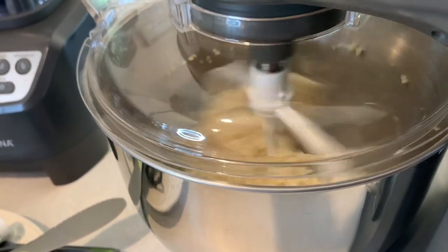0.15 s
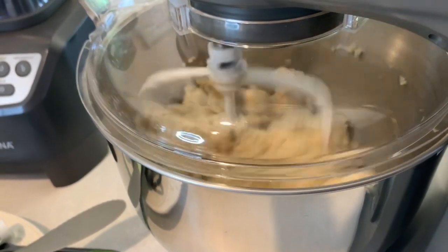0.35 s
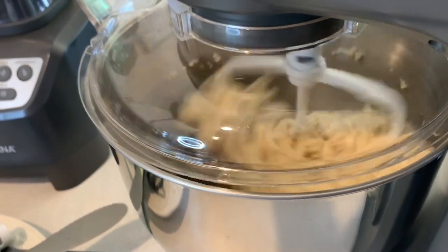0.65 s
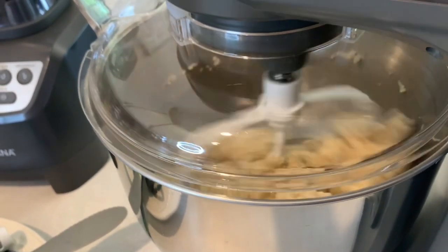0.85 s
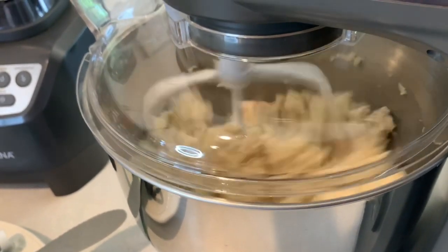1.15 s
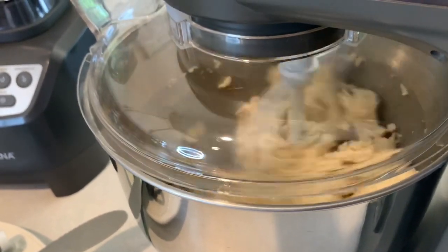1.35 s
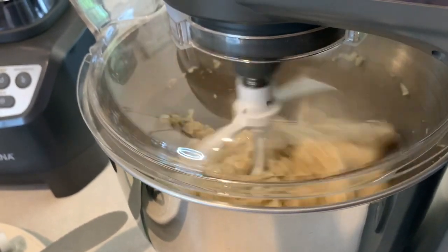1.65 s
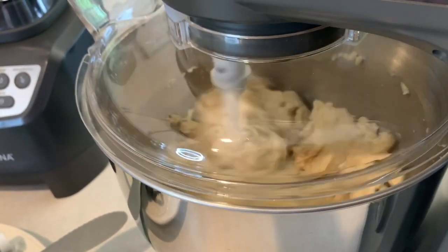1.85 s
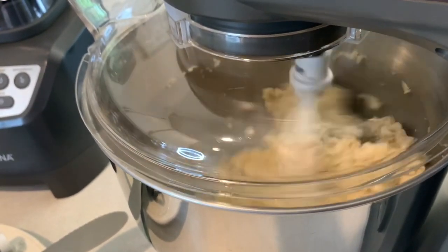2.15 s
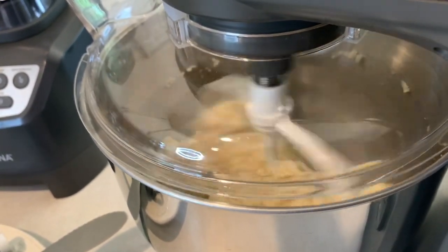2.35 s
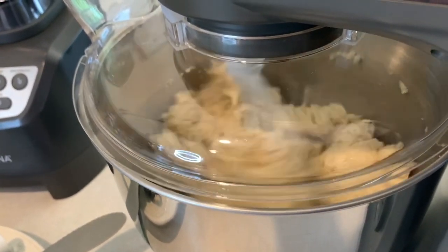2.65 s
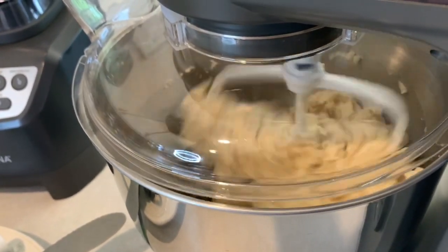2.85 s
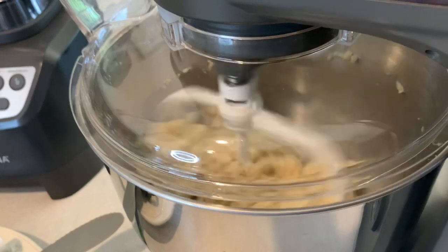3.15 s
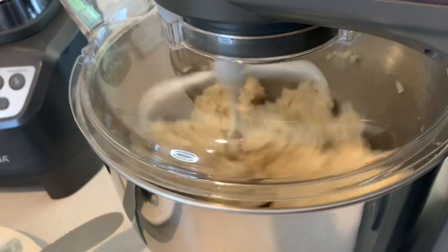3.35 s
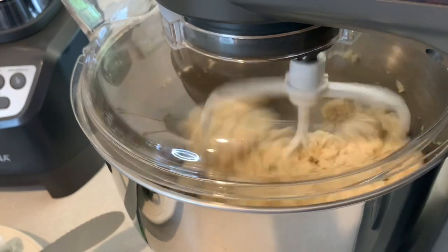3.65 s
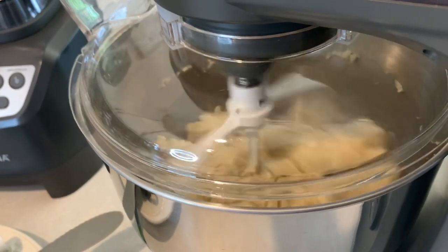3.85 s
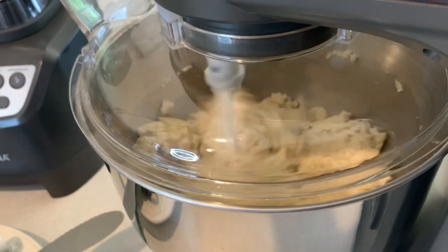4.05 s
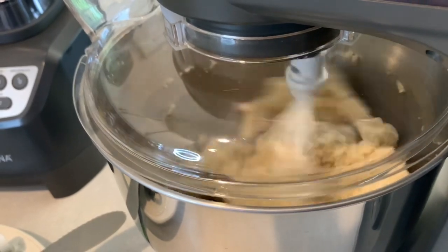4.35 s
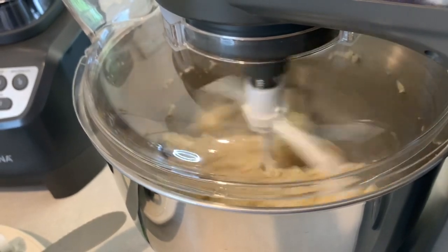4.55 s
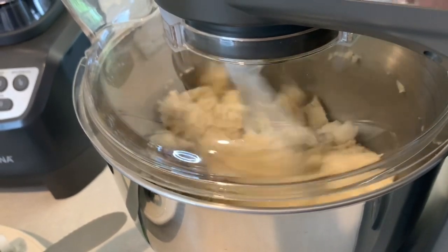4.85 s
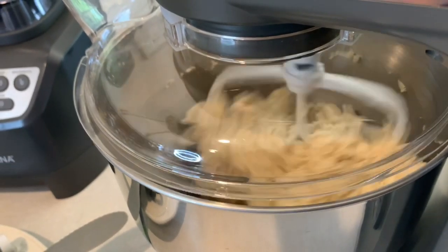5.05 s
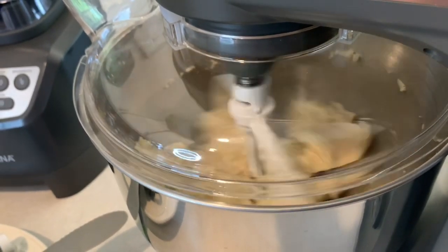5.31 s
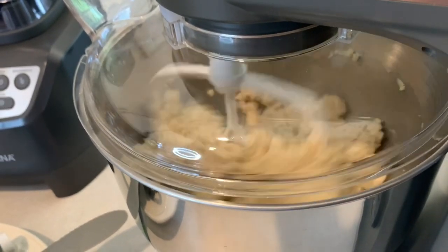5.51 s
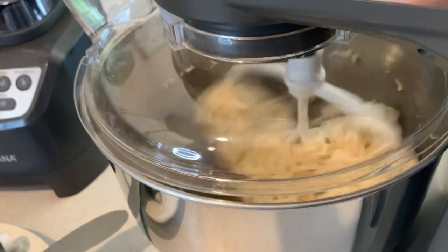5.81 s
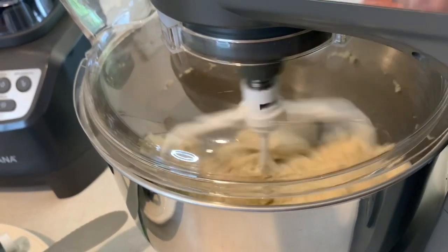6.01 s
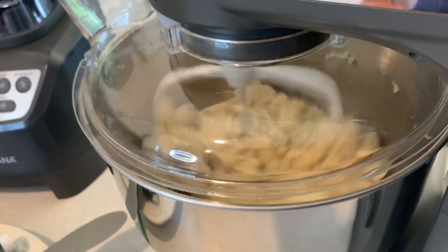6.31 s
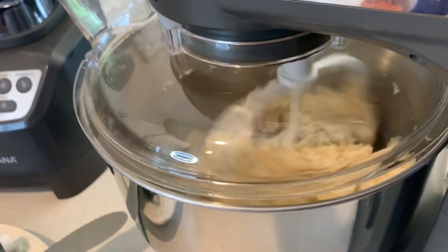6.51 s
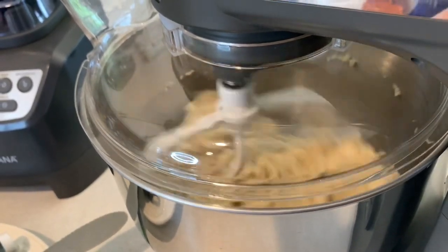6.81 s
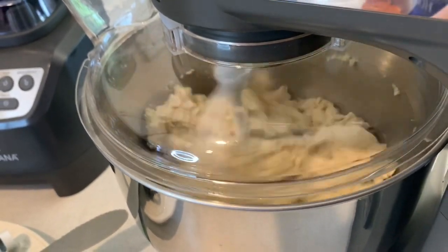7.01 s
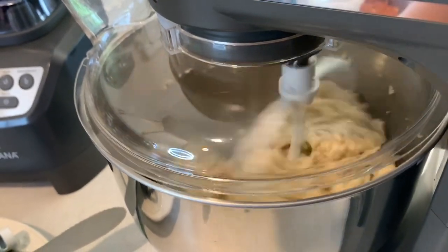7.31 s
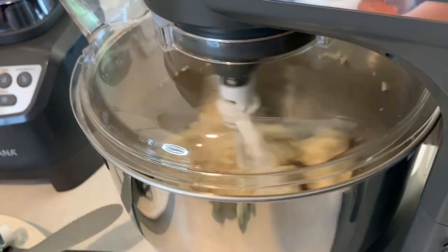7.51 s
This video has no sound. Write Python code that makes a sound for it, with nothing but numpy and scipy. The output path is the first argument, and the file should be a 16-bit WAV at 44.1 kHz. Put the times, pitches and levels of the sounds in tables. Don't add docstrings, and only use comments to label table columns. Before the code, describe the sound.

A stand mixer works stiff dough in a steel bowl, heard very close in a kitchen. A constant electric hum and gear whine sit under a harsh, bright metallic buzz with rapid ticking. The load wavers as the beater circles and digs in, with dull thumps of dough. The handheld microphone is overloaded and slightly distorted; the mixer never stops.

```python
import sys
import numpy as np
from scipy import signal
from scipy.fft import rfft, irfft, next_fast_len
from scipy.io import wavfile
from scipy.ndimage import uniform_filter1d

SR = 44100
rng = np.random.default_rng(int(sys.argv[2]) if len(sys.argv) > 2 else 0)


def linear_from_db(decibels):
    return 10 ** (np.asarray(decibels, float) / 20)


def transcribe(u):
    v = np.clip(np.atleast_2d(u).T, -1, 1)
    q = np.round(v * 32767).astype(np.int16)
    wavfile.write(sys.argv[1], SR, q)


N = 338247

TEETH = 14
MOTOR_RATIO = 11 / 3
HUM_HZ = 120
BEATER_HZ, BEATER_RIPPLE = 4.56, 0.044
ORBIT_HZ = 1.355

# time in seconds, turns per second.
GEAR_SPEED = [(0.0, 35.879), (0.3, 36.086), (0.63, 35.958), (1.23, 36.34), (1.53, 35.896), (1.8, 36.33),
              (2.17, 35.93), (2.44, 36.082), (3.1, 36.167), (3.58, 35.929), (3.79, 36.198), (3.97, 35.955),
              (4.54, 36.159), (5.59, 36.076), (5.87, 35.819), (6.11, 36.183), (7.16, 35.956),
              (7.67, 36.262)]
TONE_ORDERS = [11 / 3, 22 / 3, 8.854, 9.482, 14, 24, 26, 28, 30, 42, 44, 143 / 3, 56, 172 / 3, 70, 82, 88,
               98, 120]
# left level in dB, right level in dB, left lead in radians, flutter in dB.
GEAR_TONES = [(-29.5, -23.5, 1, 0.54), (-41, -44.5, 0, 9), (-44, -43, -0.1, 5), (-38, -40, 0.45, -5),
              (-35, -36, -0.5, 4), (-37, -35, -1.5, 5), (-42, -45, -3.5, 4), (-22, -18.5, -2.18, 1.2),
              (-46, -40, -2.5, -5), (-30.5, -41, -1.86, 3.), (-23.5, -21.5, 2.5, 2.5),
              (-32.5, -32, -1.84, 3.), (-34.5, -49, 0.45, 3.), (-51, -47, 2.5, 3.), (-36, -38, -0.3, 3.),
              (-32.5, -52, 6, 3.), (-32.5, -34.5, -1.27, 2.5), (-47, -47, 0.5, 3.), (-38, -42, -0.5, 3.)]
HUM_MULTIPLES = [.5, 1, 2, 3, 4, 5, 6, 7, 8]
# left level in dB, right level in dB, left lead in radians, start in radians.
HUM_TONES = [(-43, -65, -4.5, .3), (-28, -26.5, 0.87, 0.34), (-76, -86, -14, 0.18), (-25, -24, 0.42, 0.22),
             (-31.5, -30.5, 0.2, 0.3), (-44, -33, -2, .3), (-40, -41, 1.5, .3), (-34.5, -28.5, 0.98, 0.67),
             (-31, -37, -5, 0.12)]
# frequency in Hz, level in dB per Hz.
RUMBLE_MID = [(12, -50), (25, -23), (70, -15.5), (200, -8.5), (420, -12), (700, -11), (1160, -14.5),
              (1600, -9.5), (2320, -14.5), (4000, -12), (5200, -14.5), (6200, -12.5), (8000, -46)]
# frequency in Hz, level in dB per Hz.
RUMBLE_SIDE = [(12, -57), (25, -26), (70, -20), (200, -21), (700, -23), (1000, -23), (1250, -11),
               (1620, -16), (2370, -15), (4000, -13.5), (6200, -17), (8000, -54)]
# frequency in Hz, width in Hz, level in dB.
BOWL_MODES = [(305, 73, 3), (858, 32, 8), (1042, 79, 6.5), (927, 35, 9), (1330, 35, 3.5), (1480, 36, 2),
              (1600, 320, 2.5), (2080, 66, 8.5), (3146, 50, 3.5), (3930, 200, -4)]
# frequency in Hz, level in dB per Hz.
HISS_MID = [(5820, -58), (9900, 3.5), (11400, 1), (13200, -4), (15100, 1), (15700, 1.5)]
# frequency in Hz, level in dB per Hz.
HISS_SIDE = [(5820, -26), (9900, 4), (10400, -12), (10800, -15), (11500, -23), (12300, 0), (13100, -7),
             (14500, 3), (15700, -34)]
# time in seconds, shift from 0 to 1, share of rumble bass kept.
BASS_SHIFT = [
    (0, 0, 1.05),
    (3.3, 0, 1.05),
    (4.05, 1, .75),
    (5.8, 1, .55),
    (7.67, .75, .4),
]
# time in seconds, level in dB over the steady shake.
DOUGH_THUMPS = [(.21, 4), (.77, 3), (1.69, 2), (1.92, 5), (2.14, 4), (2.45, 5), (3.05, 6), (3.54, 11),
                (3.82, 10), (3.99, 8), (4.2, 7), (4.55, 5), (5.0, 6), (5.62, 12), (5.78, 13), (6.96, 7),
                (7.25, 6), (7.63, 5)]
# cycles per gear turn, swells per circle,
# first peak in seconds, depth in dB.
ORBIT_SWELLS = [(14, 1, 0.28, 5.5), (42, 1, 0.56, 4), (28, 2, 0.16, 2), (88, 2, 0.32, 2.7),
                (70, 1, .006, 0.1)]
# time in seconds, strength in dB, length in seconds.
BEATER_DIGS = [(0.447, 7, 0.11), (1.2, 4.5, .13), (1.927, 5.5, 0.11), (2.763, 3, 0.05), (3.395, 4, 0.072),
               (4.283, 2, 0.16), (4.9, 2.5, 0.12), (5.35, 0.5, .12), (5.704, 4.5, .07), (6.452, 2.5, 0.34),
               (7.1, 2, 0.15), (7.452, 5.5, 0.32)]
# frequency in Hz, width in Hz, level in dB.
RING_MODES = [
    [(6030, 200, -21), (6300, 200, -20), (6550, 150, -16), (6800, 250, -14)],
    [(7065, 60, -4), (7200, 80, -6), (7310, 100, -1.5), (7530, 140, -1.5), (7665, 90, -2), (7780, 90, -7)],
    [(7880, 90, -8), (8035, 60, -1), (8135, 90, -1.5), (8250, 100, 0)],
    [(8560, 110, -5), (8690, 120, -6), (8810, 110, -8), (9104, 25, -9)],
    [(9250, 120, -18), (9520, 120, -16), (9800, 200, -14)],
]
# place on the gear in teeth, level in dB.
RING_TEETH = [
    [(.5, -3), (2.6, 3), (3.9, 1), (5.2, -4), (12, 5), (13, -5)],
    [(1.6, -4), (3, 1), (5.2, -4), (6.9, 0), (9.9, -8), (11.3, 1), (12.4, 3), (13.1, 3), (13.8, 1),
     (.6, -3)],
    [(5.8, -2), (6.7, 4), (7.7, -3), (8.7, -4), (9.7, 2), (10.7, -4), (12.1, 4), (13.6, -3)],
    [(6.8, -1), (7.9, 1), (8.9, -1), (9.8, 1), (10.7, 0), (12.4, -1), (13.5, -5)],
    [(6.1, -9), (7.7, -9), (9.9, -5), (10.6, -6), (12.8, -10)],
]
# likeness of the two mics from 0 to 1, level in dB.
RING_MICS = [(0.36, 1), (1, 1.5), (0.98, 1.5), (1, 1.2), (0.7, -0.71)]
# frequency in Hz, share of the time.
DROP_MID = [(2000, 0), (2400, .2), (4700, .15), (5200, .38), (5800, .3), (6100, 0), (8300, 0), (8400, .6),
            (9600, .6), (9800, .1), (10300, .4), (11000, .12), (12000, .3), (12800, .65), (14200, .45),
            (14800, .03)]
# frequency in Hz, share of the time.
DROP_SIDE = [(2000, 0), (2300, .15), (3000, .05), (4500, .15), (5500, .08), (6400, .2), (6800, 0),
             (9600, .02), (10000, .6), (10400, .9), (11700, .88), (12200, .2), (12600, .02), (15700, .2)]


def level(x, db):
    return x * linear_from_db(db) / np.sqrt(np.mean(x ** 2))


def filtered(x, gain):
    size = next_fast_len(N)
    hz = np.arange(1, size // 2 + 2) * SR / size
    return irfft(rfft(x, size) * gain(hz), size)[..., :N]


def modes(hz, table):
    total = 0
    for k, (center, width, db) in enumerate(table):
        total = total + (-1) ** k * linear_from_db(db) / (1 + 1j * (hz ** 2 - center ** 2) / (hz * width))
    return total


def colour(hz, table):
    f, db = np.transpose(table)
    return linear_from_db(np.interp(np.log(hz), np.log(f), db, right=-120))


def curve(table, column=1):
    rows = np.array(table)
    return np.interp(np.arange(N) / SR, rows[:, 0], rows[:, column])


def bumps(times, heights, lengths):
    t = np.arange(N) / SR
    return sum(h * np.exp(-((t - s) / w) ** 2) for s, h, w in np.broadcast(times, heights, lengths))


def walk(rate):
    k = int(SR / rate)
    steps = np.repeat(rng.standard_normal(N // k + 1), k)
    return 1.3 * uniform_filter1d(uniform_filter1d(steps, k), k)[:N]


def scrape(turns, repeat):
    flank = rng.standard_normal(1222)
    repeat = np.clip(repeat, 0, 1)
    same = flank[(turns % 1 * len(flank)).astype(int)]
    return np.sqrt(repeat) * same + np.sqrt(1 - repeat) * rng.standard_normal(N)


def contacts(turns, table, width, between_db, contrast):
    tooth = np.arange(TEETH * 100) / 100
    power = linear_from_db(between_db) ** 2
    for place, db in table:
        away = (tooth - place + TEETH / 2) % TEETH - TEETH / 2
        power = power + linear_from_db(contrast * db) ** 2 * np.exp(-(away / width) ** 2)
    return np.sqrt(power)[(turns % 1 * len(tooth)).astype(int)]


def mics(mid, side):
    return np.array([mid + side, mid - side])


def effort():
    return -1.5 + bumps(*np.transpose(BEATER_DIGS))


def swell(order):
    t = np.arange(N) / SR
    db = 0
    for swelling, per_orbit, peak, depth in ORBIT_SWELLS:
        if round(swelling) == order:
            db = db + depth * np.cos(round(per_orbit) * 2 * np.pi * ORBIT_HZ * (t - peak))
    return db + 1.57 * effort() if order == 44 else db


def tone(phase, left_db, right_db, lead, bass=0.):
    shift = bass * curve(BASS_SHIFT)
    left = linear_from_db(left_db - 0.28 * shift) * np.sin(phase + lead - 1.85 * shift)
    right = linear_from_db(right_db - 1.45 * shift) * np.sin(phase - 1.72 * shift)
    return np.sqrt(2) * np.array([left, right])


def hiss(turns):
    hard_teeth = [(12.8, 4), (13.3, 0), (.1, -4), (10.4, -5)]
    tick = contacts(turns, hard_teeth, width=.15, between_db=0, contrast=1)

    def shape(table):
        return lambda hz: colour(hz, table) * (hz > table[0][0])

    mid = filtered(tick * linear_from_db(0.3 * walk(40)) * rng.standard_normal(N), shape(HISS_MID))
    side = filtered(tick * linear_from_db(1.0 * walk(37)) * rng.standard_normal(N), shape(HISS_SIDE))
    return mics(level(mid, -21), level(side, -20.5))


def thumps():
    shake = filtered(rng.standard_normal(N), lambda hz: modes(hz, [(59.7, 20, 0)]) ** 2)
    return level(shake, -2.5) * linear_from_db(-39.5 + bumps(*np.transpose(DOUGH_THUMPS), 0.065))


def rumble(turns):
    def body(hz):
        return np.sqrt(1 + sum(np.abs(modes(hz, [m])) ** 2 for m in BOWL_MODES))

    def casing(x):
        ringing = filtered(x, lambda hz: np.abs(modes(hz, [(1510, 200, 0)])) ** 2)
        return ringing * (linear_from_db(.55 * effort()) - 1)

    mid = scrape(turns, 0.19) * linear_from_db(0.39 * walk(7.2))
    side = scrape(turns, 0.23) * linear_from_db(0.5 * walk(21))
    mid = level(filtered(mid, lambda hz: colour(hz, RUMBLE_MID) * body(hz)), -16)
    side = level(filtered(side, lambda hz: colour(hz, RUMBLE_SIDE) * body(hz)), -18)
    mid, side = mid + casing(mid), side + casing(side)
    bass = filtered(mid, lambda hz: 1 / (1 + (hz / 300) ** 4))
    heave = curve(BASS_SHIFT, column=2) * linear_from_db(2.4 * walk(8))
    mid = mid + (heave - 1) * bass
    side = side + 1.1 * curve(BASS_SHIFT) * bass[::-1]
    return mics(mid + thumps(), side) * linear_from_db([[-.8], [.8]])


def hum(mains):
    out = 0
    for k, (left_db, right_db, lead, start) in zip(HUM_MULTIPLES, HUM_TONES):
        out = out + tone(2 * np.pi * k * mains + start, left_db, right_db, lead, bass=k < 3)
    return out


def whine(turns):
    out = 0
    for order, (left_db, right_db, lead, flutter_db) in zip(TONE_ORDERS, GEAR_TONES):
        phase = 2 * np.pi * (order * turns + rng.random())
        db = np.clip(flutter_db, 0, 2.5) * walk(12) + swell(order)
        out = out + linear_from_db(db + 3.5) * tone(phase, left_db, right_db, lead, bass=order < 8)
    mains = HUM_HZ * np.arange(N) / SR
    beat = 2 * np.pi * (MOTOR_RATIO * turns + 3 * mains)
    return out + hum(mains) + tone(beat, -32, -42, -1.2)


def head(turns):
    out = 0
    for table, teeth, (alike, db) in zip(RING_MODES, RING_TEETH, RING_MICS):
        force = contacts(turns, teeth, width=0.24, between_db=-13, contrast=0.93) * linear_from_db(0.51 * walk(30))
        alike = np.clip(alike, 0, 1)
        near = force * scrape(turns, 0.21)
        other = force * rng.standard_normal(N)
        left = alike * near + np.sqrt(1 - alike ** 2) * other
        drive = np.array([left, near]) / np.sqrt(np.mean(force ** 2))
        ringing = filtered(drive, lambda hz: modes(hz, table) * modes(hz, [(7200, 5100, 0)]) ** 2)
        out = out + linear_from_db(db) * ringing
    out[0] = filtered(out[0], lambda hz: linear_from_db(-2) * np.exp(-2j * np.pi * (hz - 6250) * 0.00022))
    closer = np.clip(np.arange(N) / SR - 5.8, 0, .25)
    return level(out, -4) * linear_from_db(2.4 * closer - 0.52)


def scene():
    ripple = BEATER_RIPPLE * np.cos(2 * np.pi * BEATER_HZ * np.arange(N) / SR)
    turns = np.cumsum(curve(GEAR_SPEED) + ripple) / SR
    return hiss(turns) + rumble(turns) + whine(turns) + head(turns)


def starve(x, shares):
    hz, _, frames = signal.stft(x, SR, nperseg=2048)
    band = (9 * np.sqrt(np.arange(len(hz)))).astype(int)
    chance = rng.standard_normal((band[-1] + 1, frames.shape[1]))
    chance = uniform_filter1d(chance, 2, axis=1)
    together = np.linspace(-.9, 1.2, len(chance)).clip(0)[:, None]
    chance = chance + together * chance[0]
    rank = chance.argsort(axis=1).argsort(axis=1) / frames.shape[1]
    kept = rank[band] >= np.interp(hz, *np.transpose(shares), left=0)[:, None]
    return signal.istft(frames * kept, SR, nperseg=2048)[1][:N]


def roll_off(x):
    return signal.sosfilt(signal.butter(12, 15780, fs=SR, output="sos"), x)


def record(dry):
    flat = np.clip(dry, -1.06, 1.06)
    mid = flat.sum(axis=0) / 2
    side = (flat[0] - flat[1]) / 2
    mix = mics(starve(mid, DROP_MID), starve(side, DROP_SIDE))
    return roll_off(mix)


dry = scene()
out = record(dry)
transcribe(out)
```